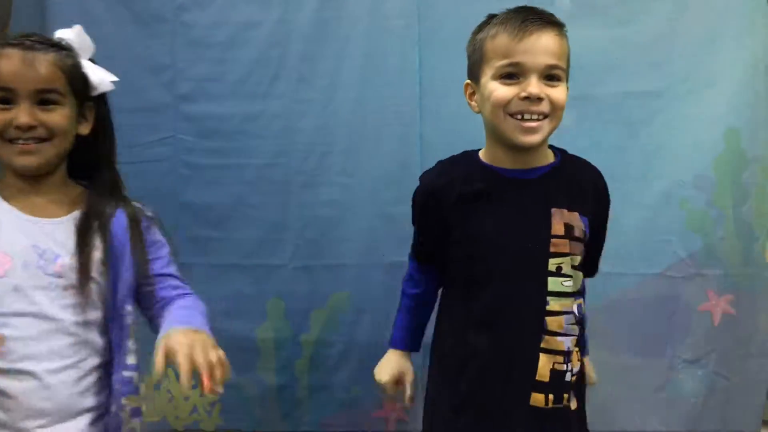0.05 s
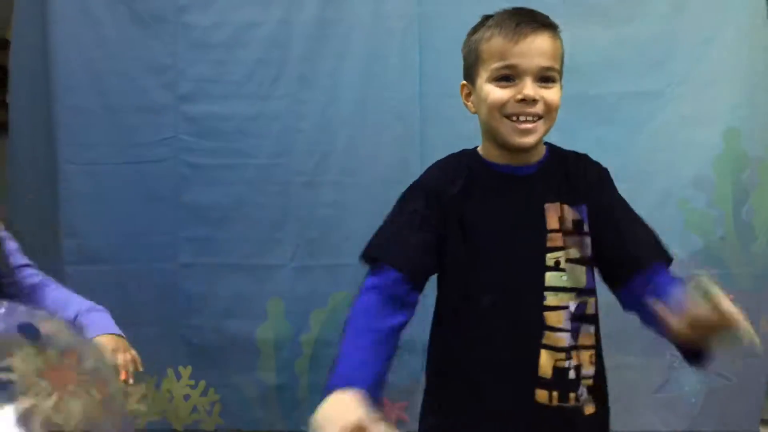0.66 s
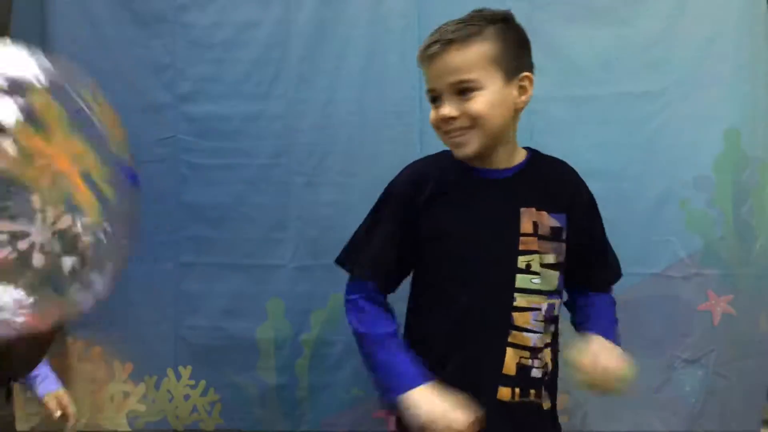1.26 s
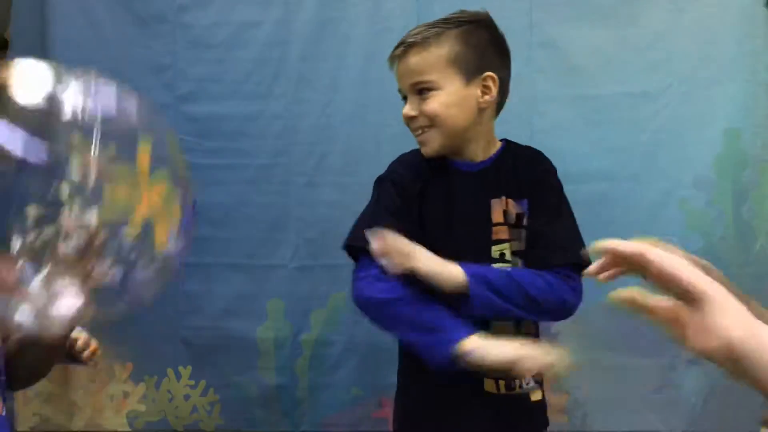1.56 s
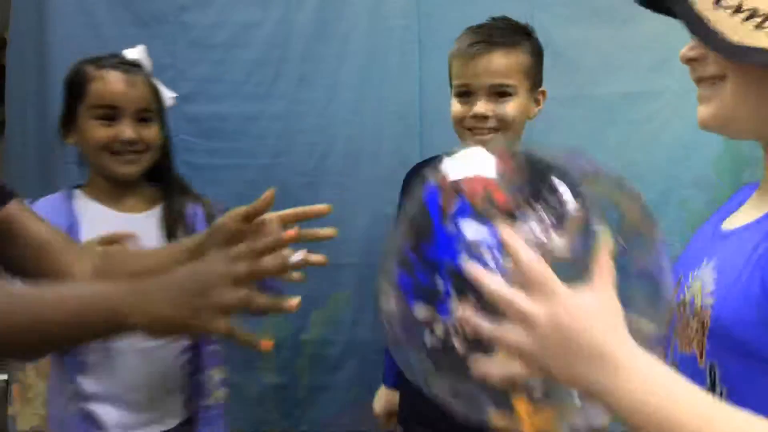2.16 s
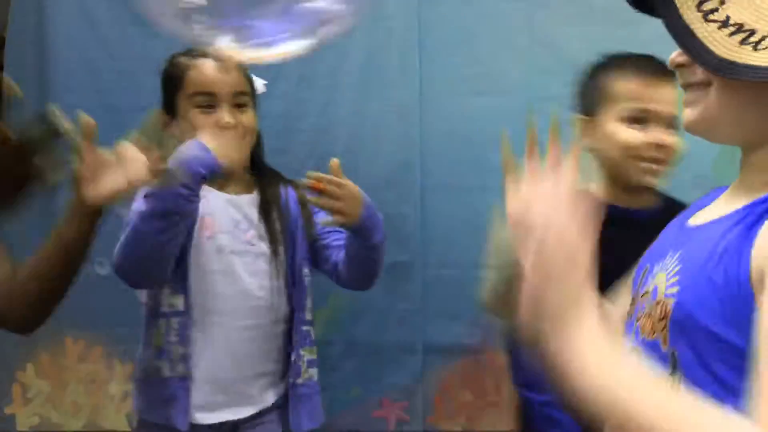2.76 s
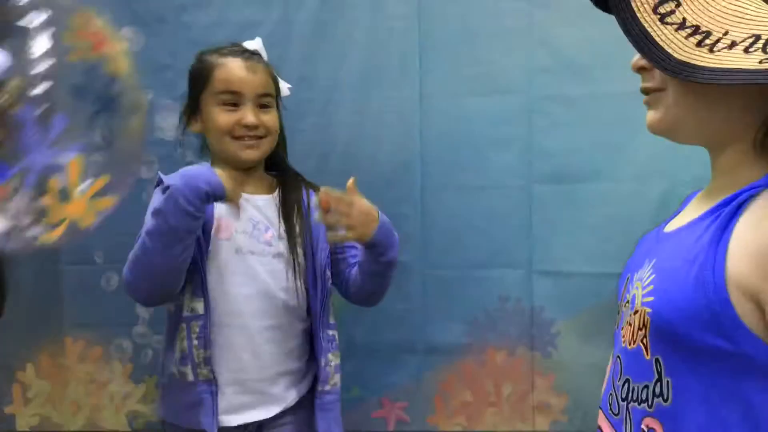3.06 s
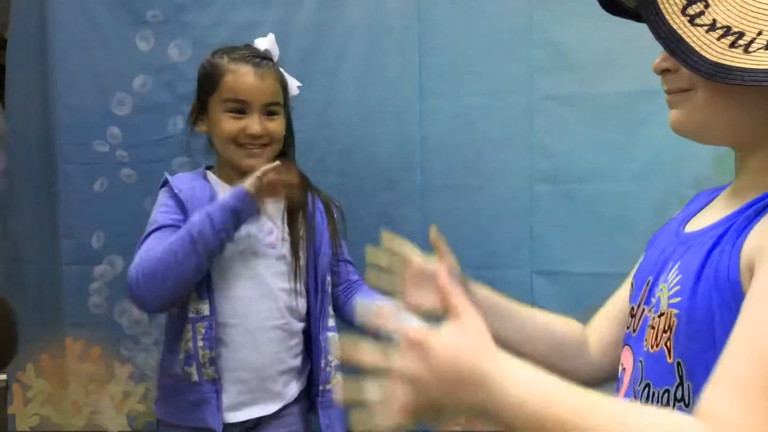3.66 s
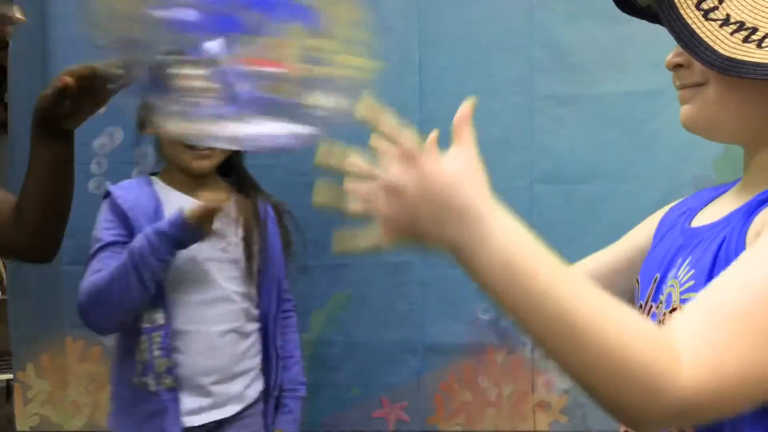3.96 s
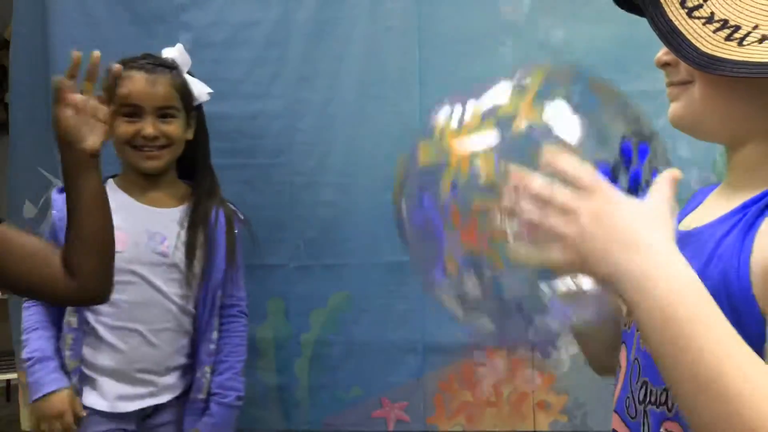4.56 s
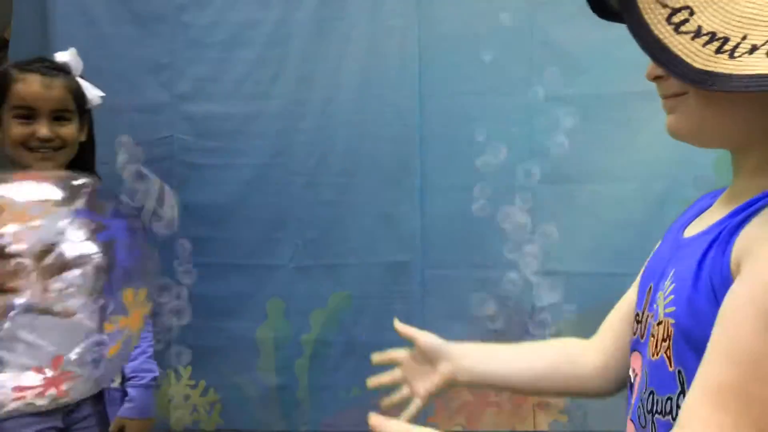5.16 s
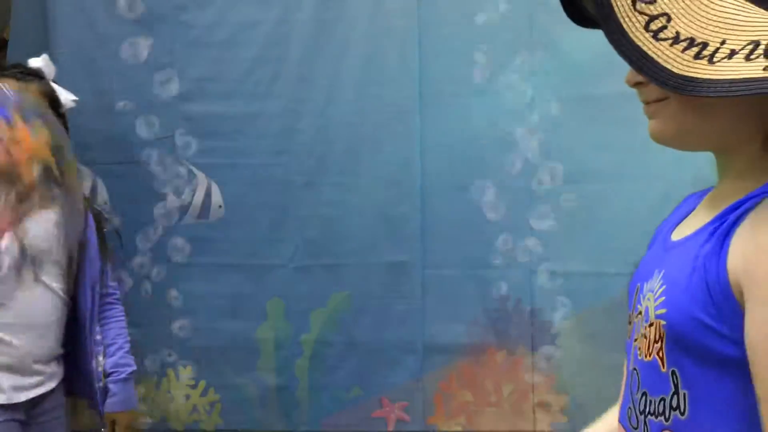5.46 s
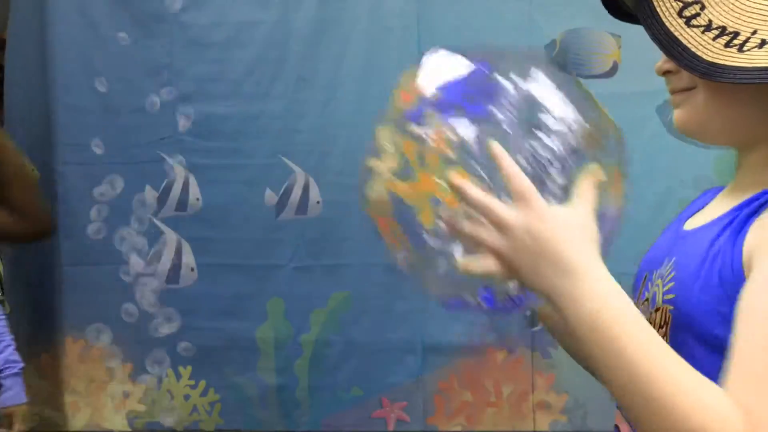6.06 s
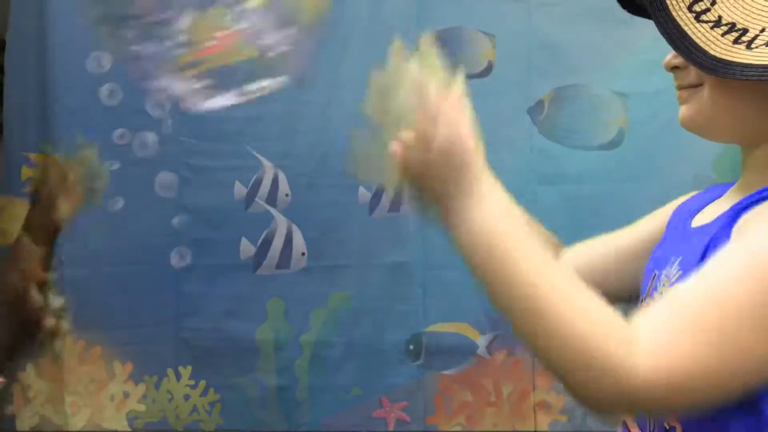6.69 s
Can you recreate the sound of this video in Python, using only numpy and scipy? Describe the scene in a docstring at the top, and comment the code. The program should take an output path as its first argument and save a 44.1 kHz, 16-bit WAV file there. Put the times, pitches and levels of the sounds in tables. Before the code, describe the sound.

Close by, hands knock an inflatable beach ball around indoors. Gentle nudges come first, then hollow, ringing thumps about once a second, each with a crinkle of vinyl. Two slaps stand out as loud and sharp, the first and one near the end. Quiet catches, slides and tiny finger squeaks fall between them. The room rings briefly, while clothes rustle softly and ventilation rumbles underneath.

```python
"""Hollow thumps and vinyl crinkles, close by: children bat an inflatable beach ball around a room.
Each hand dents the skin with a falling thump, rings the air inside and buckles the vinyl.
Fingers tick and squeak as they slip on the ball. The room answers with a short reverberation.
Behind it, clothes rustle over a low ventilation rumble."""
import sys
import numpy as np
from scipy import signal
from scipy.fft import rfft, irfft, next_fast_len
from scipy.io import wavfile

SR = 44100
rng = np.random.default_rng(int(sys.argv[2]) if len(sys.argv) > 2 else 0)


def master(y):
    """Save y as 16-bit WAV."""
    cut = np.clip(np.atleast_2d(y).T, -1, 1)
    pcm = np.round(cut * 32767)  # scale
    wavfile.write(sys.argv[1], SR, pcm.astype(np.int16))


N = 305613
TIME_S = np.arange(N) / SR

# A bat: fingers land, the palm dents the skin, then a crack and a rebound thump follow in either order.
# Each row: palm time in seconds, palm level in dB, dent pitch in Hz, dent decay in seconds,
# finger lead in seconds, finger level in dB, rebound delay in seconds, rebound level in dB,
# hollow note pitch in Hz, note level in dB, note decay in seconds, crinkle level in dB,
# crack level in dB, crack decay in seconds.
HAND_BATS = [(2.0744, -15, 423, 0.0021, 0.0091, -43, 0.01, -15, 380, -25.5, 0.006, -34.5, -24.5, 0.0041),
             (3.018, -36.5, 373, 0.0078, 0.0075, -53, 0.0048, -30.5, 234.5, -30.5, 0.01, -47.5, -51.5, 0.061),
             (4.0209, -29, 713, 0.0021, 0.012, -33, 0.0046, -31.5, 409, -33, 0.0049, -41, -57, .008),
             (4.168, -20, 553, 0.0014, 0.0075, -32, 0.0076, -30, 257, -51, 0.0042, -42.5, -60, .004),
             (4.1981, -32, 353, 0.0035, 0.011, -36, 0.0049, -33, 256, -30.5, 0.0052, -42, -42, 0.01),
             (5.1431, -16.5, 440, 0.0021, 0.0053, -37, 0.0085, -21.5, 548, -20, 0.0053, -32, -38, 0.016),
             (6.0563, -25, 496, 0.0026, 0.014, -36.5, 0.0076, -40.5, 358.6, -32, 0.018, -44, -68, 0.0074)]
# Catches and nudges. Each row: time in seconds, thump level in dB, dent pitch in Hz,
# dent decay in seconds, crinkle level in dB, brightness in Hz, press time in seconds.
HAND_TOUCHES = [(0.264, -84, 600, .004, -46.5, 3100, 0.0014), (0.835, -48.5, 358, 0.12, -54.5, 700, 0.003),
                (0.9291, -44, 585, 0.07, -49.5, 690, 0.0015), (2.307, -49.5, 560, 0.085, -54, 1480, 0.0045),
                (2.431, -49.5, 500, 0.038, -51.5, 1220, 0.0054),
                (2.461, -45.5, 466, 0.016, -43.5, 2320, 0.0011),
                (3.112, -36, 512, 0.0012, -50, 1200, 0.0018),
                (3.175, -72, 580, 0.0045, -51.5, 1000, 0.0025),
                (3.363, -46.5, 800, 0.0016, -63, 1470, 0.0033),
                (3.53, -55.5, 840, 0.0071, -65, 1490, 0.0058),
                (3.918, -44.5, 774, 0.0049, -41, 2620, 0.0033),
                (4.4107, -39.5, 650, 0.0098, -50.5, 1110, 0.0051),
                (4.49, -36, 380, 0.0057, -81, 1010, 0.0023),
                (5.652, -56.5, 550, 0.0095, -51.5, 2920, 0.0019),
                (6.313, -52.5, 450, 0.013, -54.5, 6040, 0.0012), (6.58, -45, 593, 0.008, -72, 1620, 0.0028)]
# Air inside the ball. Each row: frequency in Hz, gain in dB, T60 in seconds.
CAVITY_MODES = [(359, -16, 0.14), (533, -27, 0.2), (614, 11.5, 0.022), (760, -14, 0.16), (1006, 1, 0.039),
                (1210, -8.5, 0.013), (1370, -10.5, 0.029), (1560, -11, 0.18), (1817, -38, 0.058),
                (2110, -14, 0.11), (2250, -44, 0.031), (2530, -31, 0.054)]
# Folds popping through. Each row: time in seconds, level in dB, brightness in Hz.
FOLD_POPS = [(2.0784, -22, 12000), (2.0808, -9.5, 13900), (2.0902, -15, 2500), (2.093, -17, 1600),
             (4.0102, -46, 600), (4.169, -30, 990), (5.147, -24.5, 6000), (5.1504, -18.5, 11000),
             (5.154, -32, 7000)]
# Ball sliding between hands. Each row: peak time in seconds, level in dB, brightness in Hz.
HAND_SLIDES = [(0.289, -53, 7240), (3.092, -56.5, 890), (4.457, -52.5, 1390), (4.942, -60, 3000),
               (5.325, -53, 1200)]
# Crinkle spectrum. Each row: frequency in Hz, gain in dB.
VINYL_SPECTRUM = [(150, -8.5), (400, -3.5), (650, 0.5), (860, -6), (1200, -4), (1650, -8), (2100, -8),
                  (3800, -17), (5000, -18), (7200, -16.5), (10500, -28.5), (12000, -17), (15500, -29)]
# Fingertips and seams. Each row: start in seconds, level in dB, centre in Hz, bandwidth in Hz,
# decay in seconds.
SKIN_TICKS = [(0.182, -64, 9100, 5000, 0.00098), (0.3768, -46.5, 2500, 2270, 0.0005),
              (0.3765, -63, 10600, 3000, 0.0017), (0.635, -69.5, 4900, 4000, 0.014),
              (0.681, -64, 1480, 706, 0.0044), (0.9301, -50, 970, 990, 0.00042),
              (1.41, -54.5, 284, 49, 0.039), (1.891, -67.5, 4570, 4900, 0.0048),
              (2.0512, -55, 8500, 6500, 0.00076), (2.307, -57.5, 6940, 4300, 0.00074),
              (2.868, -54, 3270, 1870, 0.0027), (3.112, -47.5, 1360, 900, 0.0012),
              (3.92, -46, 2500, 1310, 0.0028), (4.17, -33, 1680, 1450, 0.00067),
              (4.941, -60.5, 2370, 2580, 0.0049), (6.034, -65, 5070, 4040, .0021)]
# Dragging fingers. Each row: start in seconds, length in seconds, level in dB, start pitch in Hz,
# end pitch in Hz.
FINGER_SQUEAKS = [(2.568, 0.013, -74, 5300, 5670), (2.573, 0.027, -59, 1310, 1480),
                  (2.584, 0.076, -74.5, 4870, 4080), (2.596, 0.091, -79, 5300, 5700),
                  (3.016, 0.027, -51, 1472, 1560), (3.019, 0.039, -53.5, 2184, 2680)]
# A farther ball gives more room sound. Each row: time in seconds, room send in dB.
DISTANCE_SEND = [(0.9, -2), (2.08, -5), (2.2, 6), (2.45, 2), (3.05, 2.5), (4.1, 1), (4.45, -1), (5.15, -1),
                 (6.05, 2.5)]
# Near surfaces. Each row: delay in seconds, gain in dB.
WALL_BOUNCES = [(.0042, -11), (.0098, -42), (0.0157, -22.5), (0.027, -12)]
# Diffuse room sound. Each row: frequency in Hz, gain in dB.
ROOM_SPECTRUM = [(50, -29.5), (110, -10), (190, -6), (400, -6), (1000, -8), (3000, -3.5), (7000, -7.5),
                 (15000, -7)]
# Diffuse tail. Each row: frequency in Hz, T60 in seconds.
ROOM_DECAY = [(60, 1), (200, 0.58), (1000, 0.48), (3000, 0.48), (7000, 0.2), (15000, 0.49)]
# Early scatter. Each row: frequency in Hz, level in dB re the tail.
ROOM_SCATTER = [(450, 9.5), (1800, 10)]
# Clothes of the moving players. Each row: time in seconds, relative level in dB.
RUSTLE_LEVELS = [(0.0, -73.5), (.55, -76), (0.93, -79), (1.1, -72.5), (1.33, -77), (1.6, -72), (1.9, -77.5),
                 (2.45, -76), (2.8, -83), (3.05, -75.5), (3.53, -79), (3.72, -67.5), (3.86, -71.5),
                 (3.98, -78), (4.7, -76.5), (5.05, -73), (5.4, -73), (5.75, -82), (6.1, -81.5), (6.93, -82)]
# Arm swings. Each row: peak time in seconds, level in dB, half length in seconds, brightness in Hz.
SLEEVE_SWISHES = [(0.278, -57.5, 0.014, 4570), (1.153, -68.5, 0.028, 2500), (1.377, -63.5, 0.013, 900),
                  (3.689, -60.5, 0.046, 1030), (4.388, -66, 0.017, 7990), (4.851, -64.5, 0.024, 2560),
                  (5.845, -65.5, 0.0098, 9300), (5.923, -65.5, 0.016, 5170), (6.419, -63.5, 0.022, 700),
                  (6.583, -67, 0.035, 9400), (6.913, -62, .011, 9150)]
# Rubbing fabric. Each row: frequency in Hz, gain in dB.
CLOTH_SPECTRUM = [(300, 14), (1000, 5), (3000, 3), (4800, -4), (7500, -6.5), (10500, -10.5), (15500, -9.5)]
# Ventilation rumble. Each row: frequency in Hz, gain in dB.
VENT_SPECTRUM = [(20, -41.5), (40, -8.5), (62, 3.5), (95, -5.5), (130, -5.5), (180, -6.5), (280, -9),
                 (430, -20.5), (700, -24.5), (1100, -36.5), (3000, -37.5), (4500, -44.5), (8000, -45),
                 (15500, -56.5)]

FINGERS_HZ, FINGERS_DECAY_S = 372, 0.0045
REBOUND_HZ, REBOUND_DECAY_S = 218, 0.0038
FINGERS_AIR_DB, PALM_AIR_DB, REBOUND_AIR_DB, TOUCH_AIR_DB = -21, -27, -25.5, -23  # mode drive re thump
GRIP_DB, GRIP_RISE_S, GRIP_DECAY_S = -3.5, 0.0026, 0.011  # finger crinkle; dB re the palm's
CRINKLE_RISE_RATIO, CRINKLE_DECAY_RATIO, CRINKLE_HZ = 0.6, 3.8, 1290
CRACK_DELAY_S, CRACK_RISE_S, CRACK_HZ = 0.0069, 0.0004, 8000
POP_RISE_S, POP_DECAY_S = 0.000076, 0.00043
SLIDE_RISE_S, SLIDE_DECAY_S, TOUCH_DECAY_RATIO = 0.0066, 0.017, 2.33


def blows():
    """Skin moves: time in s, level in dB, pitch in Hz, decay in s, air drive in dB, +1 in or -1 out."""
    for time_s, palm_db, hz, decay_s, lead_s, fingers_db, rebound_s, rebound_db, *_ in HAND_BATS:
        yield time_s - lead_s, fingers_db, FINGERS_HZ, FINGERS_DECAY_S, FINGERS_AIR_DB, 1
        yield time_s, palm_db, hz, decay_s, PALM_AIR_DB, 1
        yield time_s + rebound_s, rebound_db, REBOUND_HZ, REBOUND_DECAY_S, REBOUND_AIR_DB, -1
    for time_s, db, hz, decay_s, *_ in HAND_TOUCHES:
        yield time_s, db, hz, decay_s, TOUCH_AIR_DB, 1


def thumps(rise_s=0.00077, spread_s=0.00704, tilt=0.06, wobble_hz=66.8, wobble_db=-18, wobble_s=0.041):
    """A dent spreads over the skin; its pitch falls towards a brief wobble of the whole ball."""
    out, t = np.zeros(N), TIME_S[:SR // 3]
    for start_s, db, start_hz, decay_s, _, direction in blows():
        hz = wobble_hz + (start_hz - wobble_hz) * np.exp(-t / spread_s)
        dent = np.exp(-t / decay_s) * (hz / start_hz) ** tilt
        wobble = from_db(wobble_db) * np.exp(-t / wobble_s)
        envelope = (1 - np.exp(-t / rise_s)) * (dent + wobble)
        add(out, start_s, direction * from_db(db) * envelope * np.sin(2 * np.pi * np.cumsum(hz) / SR))
    return out


def trapped_air(scatter_db=0.5, squash=0.018, recover_s=0.037):
    """Air modes ring, their strengths set by the spot hit; they bend while the ball is out of round."""
    out, t = np.zeros(N), TIME_S[:SR // 2]
    hz, mode_db, t60_s = np.transpose(CAVITY_MODES)[:, :, None]
    for start_s, db, _, _, drive_db, _ in blows():
        spot, bend = rng.standard_normal((2, len(CAVITY_MODES), 1))
        detune = 1 + squash * bend * np.exp(-t / recover_s)
        phase = 2 * np.pi * hz * np.cumsum(detune, axis=1) / SR
        gain = from_db(db + drive_db + mode_db + scatter_db * spot)
        fade = np.exp(-np.log(1000) * t / t60_s)
        add(out, start_s, np.sum(gain * fade * np.sin(phase), axis=0))
    return out


def hollow_notes(rise_s=0.0021, sag=0.076, sag_s=0.0077):
    """One brief note per bat; its pitch depends on the spot hit and sags as the skin relaxes."""
    out, t = np.zeros(N), TIME_S[:SR // 4]
    for start_s, *_, hz, db, decay_s, _, _, _ in HAND_BATS:
        phase = 2 * np.pi * hz * np.cumsum(1 - sag * (1 - np.exp(-t / sag_s))) / SR
        envelope = (1 - np.exp(-t / rise_s)) * np.exp(-t / decay_s)
        add(out, start_s, from_db(db) * envelope * np.sin(phase))
    return out


def creases():
    """Vinyl bucklings: peak time in s, level in dB, rise in s, decay in s, brightness in Hz."""
    for time_s, _, _, dent_s, lead_s, *_, crinkle_db, crack_db, crack_decay_s in HAND_BATS:
        yield time_s - lead_s, crinkle_db + GRIP_DB, GRIP_RISE_S, GRIP_DECAY_S, CRINKLE_HZ
        yield time_s, crinkle_db, CRINKLE_RISE_RATIO * dent_s, CRINKLE_DECAY_RATIO * dent_s, CRINKLE_HZ
        yield time_s + CRACK_DELAY_S, crack_db, CRACK_RISE_S, crack_decay_s, CRACK_HZ
    for time_s, db, bright_hz in FOLD_POPS:
        yield time_s, db, POP_RISE_S, POP_DECAY_S, bright_hz
    for time_s, *_, db, bright_hz, press_s in HAND_TOUCHES:
        yield time_s, db, press_s, TOUCH_DECAY_RATIO * press_s, bright_hz
    for time_s, db, bright_hz in HAND_SLIDES:
        yield time_s, db, SLIDE_RISE_S, SLIDE_DECAY_S, bright_hz


def crinkles(snaps_per_s=4000, uneven_db=2.0, pop_db=-0.5, sudden_s=0.0017):
    """Dense tiny snaps of buckling vinyl; a sudden press also pops a whole fold."""
    out, t = np.zeros(N), TIME_S[:SR // 3] - 0.1
    for peak_s, db, rise_s, decay_s, bright_hz in creases():
        press = np.exp(np.minimum(t / rise_s, -t / decay_s))
        impulses = (rng.random(len(t)) < snaps_per_s / SR) * rng.choice([-1, 1], len(t))
        snaps = press * impulses * from_db(uneven_db * rng.standard_normal(len(t)))
        pop = from_db(pop_db) * np.exp(-rise_s / sudden_s) * np.linalg.norm(snaps)
        snaps[np.argmax(press)] = pop
        # The hand sets the energy, however the snaps share it.
        gain = from_db(db) * np.sqrt(np.mean(press ** 2))
        add(out, peak_s + t[0], gain * unit_rms(lowpass(snaps, bright_hz)))
    return colour(out, VINYL_SPECTRUM)


def ticks():
    """Brief slips on the skin, each a burst of friction noise in one band."""
    out, t = np.zeros(N), TIME_S[:SR // 5]
    for start_s, db, centre_hz, width_hz, decay_s in SKIN_TICKS:
        edges_hz = np.clip([centre_hz - width_hz / 2, centre_hz + width_hz / 2], 20, SR / 2.2)
        fade = np.exp(-t / decay_s)
        slip = bandpass(fade * rng.standard_normal(len(t)), edges_hz, order=4)
        add(out, start_s, from_db(db) * np.sqrt(np.mean(fade ** 2)) * unit_rms(slip))
    return out


def squeaks(jitter=0.063, jitter_per_s=1100, rough_db=3.5, overtone_db=-19):
    """Fingers stick and slip on vinyl: a shaky gliding tone that swells quickly and fades."""
    out, shake, grip = np.zeros(N), drift(jitter_per_s), drift(jitter_per_s)
    for start_s, length_s, db, start_hz, end_hz in FINGER_SQUEAKS:
        active = (TIME_S >= start_s) & (TIME_S < start_s + length_s)
        progress = (TIME_S[active] - start_s) / length_s
        hz = (start_hz + (end_hz - start_hz) * progress) * (1 + jitter * shake[active])
        phase = 2 * np.pi * np.cumsum(hz) / SR
        envelope = np.sin(np.pi * np.sqrt(progress)) ** 2 * from_db(db + rough_db * grip[active])
        out[active] += envelope * (np.sin(phase) + from_db(overtone_db) * np.sin(2 * phase))
    return out


def near_walls(x):
    """Single bounces off the closest surfaces."""
    out = np.zeros(N)
    for delay_s, db in WALL_BOUNCES:
        add(out, delay_s, from_db(db) * x)
    return out


def room(x, build_s=0.0057, early_s=0.0074):
    """Reverberation: early scatter, then a diffuse tail dying band by band."""
    t, response = TIME_S[:SR], np.zeros(SR)
    edges_hz = np.geomspace(40, 17000, 13)
    for low_hz, high_hz in zip(edges_hz, edges_hz[1:]):
        hz = np.sqrt(low_hz * high_hz)
        tail = np.exp(-np.log(1000) * t / at_hz(ROOM_DECAY, hz))
        scatter = from_db(at_hz(ROOM_SCATTER, hz)) * np.exp(-t / early_s)
        envelope = (1 - np.exp(-t / build_s)) * (tail + scatter)
        band = bandpass(rng.standard_normal(SR), [low_hz, high_hz], order=2)
        response += from_db(at_hz(ROOM_SPECTRUM, hz)) * band * envelope / np.linalg.norm(envelope)
    return signal.fftconvolve(x, response)[:N]


def standing_wave(x, hz=181.2, gain_db=0.5, t60_s=1):
    """One low mode between the walls rings on after each thump."""
    radius = from_db(-60 / (t60_s * SR))
    feedback = [1, -2 * radius * np.cos(2 * np.pi * hz / SR), radius ** 2]
    scale = (1 - radius ** 2) / 2
    return from_db(gain_db) * signal.lfilter([scale, 0, -scale], feedback, x)


def clothes(rub_db=2.5, flutter_db=1.3, flutter_per_s=70, grain_db=3.0, grains_per_s=800):
    """Fabric rubs in uneven grains as the players move and swishes when an arm swings."""
    level_db = np.interp(TIME_S, *np.transpose(RUSTLE_LEVELS)) + rub_db
    level_db += flutter_db * drift(flutter_per_s)
    grains = from_db(grain_db * drift(grains_per_s))
    rub = unit_rms(colour(grains * rng.standard_normal(N), CLOTH_SPECTRUM))
    out, t = from_db(level_db) * rub, TIME_S[:SR // 2] - 0.25
    for peak_s, db, half_s, bright_hz in SLEEVE_SWISHES:
        swish = lowpass(colour(rng.standard_normal(len(t)), CLOTH_SPECTRUM), bright_hz)
        add(out, peak_s + t[0], from_db(db) * np.exp(-(t / half_s) ** 2 / 2) * unit_rms(swish))
    return out


def ventilation(rumble_db=-59.5, hum_hz=120, hum_db=-68.5, waver_db=2.5):
    """Steady rumble with a faint, wavering motor hum."""
    rumble = unit_rms(colour(rng.standard_normal(N), VENT_SPECTRUM))
    hum = np.sin(2 * np.pi * hum_hz * TIME_S)
    return from_db(rumble_db) * rumble + from_db(hum_db + waver_db * drift(per_s=1)) * hum


def from_db(db):
    """Decibels to gain."""
    return 10 ** (np.asarray(db) / 20)


def unit_rms(x):
    """Scale to unit rms."""
    return x / np.sqrt(np.mean(x ** 2) + 1e-20)


def at_hz(table, hz):
    """Read a table on a log-frequency axis."""
    table_hz, values = np.transpose(table)
    return np.interp(np.log(np.maximum(hz, 1)), np.log(table_hz), values)


def colour(x, spectrum):
    """Minimum-phase filter with the given spectrum."""
    size = 2 * next_fast_len(len(x) // 2 + 4096)
    gain = from_db(at_hz(spectrum, np.arange(size // 2 + 1) * SR / size))
    cepstrum = irfft(np.log(gain))
    cepstrum[1:size // 2] *= 2
    cepstrum[size // 2 + 1:] = 0
    return irfft(rfft(x, size) * np.exp(rfft(cepstrum)))[:len(x)]


def lowpass(x, corner_hz):
    """First-order low-pass."""
    return signal.lfilter(*signal.butter(1, corner_hz, fs=SR), x)


def bandpass(x, edges_hz, order):
    """Maximally flat band-pass."""
    return signal.sosfilt(signal.butter(order, edges_hz, "band", fs=SR, output="sos"), x)


def add(track, start_s, sound):
    """Mix a sound into a track."""
    start = max(round(start_s * SR), 0)
    track[start:start + len(sound)] += sound[:N - start]


def drift(per_s):
    """Random wander of unit rms."""
    return unit_rms(np.interp(TIME_S * per_s, np.arange(10000), rng.standard_normal(10000)))


def scene(side_count=3, fingers_send_db=-6, note_send_db=-7):
    """The ball in the room, over clothes and ventilation; mono."""
    body, note = thumps() + trapped_air(), hollow_notes()
    # Each side of the ball radiates its own crinkle; the room blends them.
    sides = [body + crinkles() for _ in range(side_count)]
    send = from_db(np.interp(TIME_S, *np.transpose(DISTANCE_SEND)))
    fingers = ticks() + squeaks()
    direct = sides[0] + note + fingers
    reverb = sum(room(send * side) for side in sides) / np.sqrt(side_count)
    reverb += room(from_db(fingers_send_db) * fingers + from_db(note_send_db) * send * note)
    reflected = near_walls(send * sides[1]) + reverb + standing_wave(body)
    return (direct + reflected + clothes() + ventilation())[None]


def record(dry, low_cut_hz=38, high_cut_hz=15750):
    """The microphone drops the deepest bass; the top treble is cut steeply."""
    thinned = signal.sosfilt(signal.butter(4, low_cut_hz, "high", fs=SR, output="sos"), dry)
    return signal.sosfilt(signal.ellip(10, 0.1, 80, high_cut_hz, fs=SR, output="sos"), thinned)


dry = scene()
out = record(dry)
master(out)
```